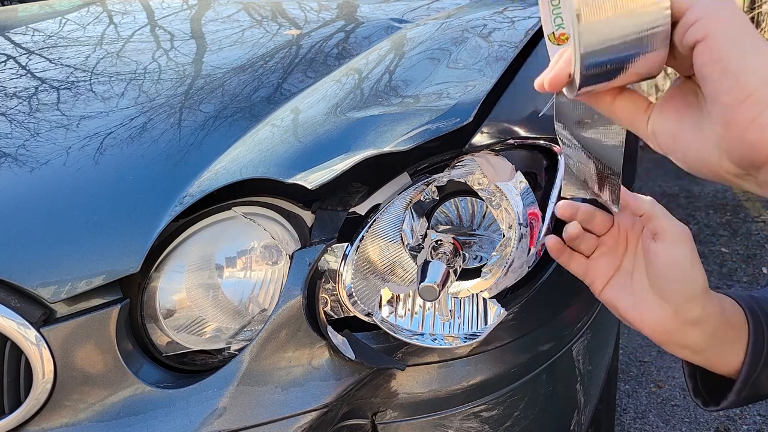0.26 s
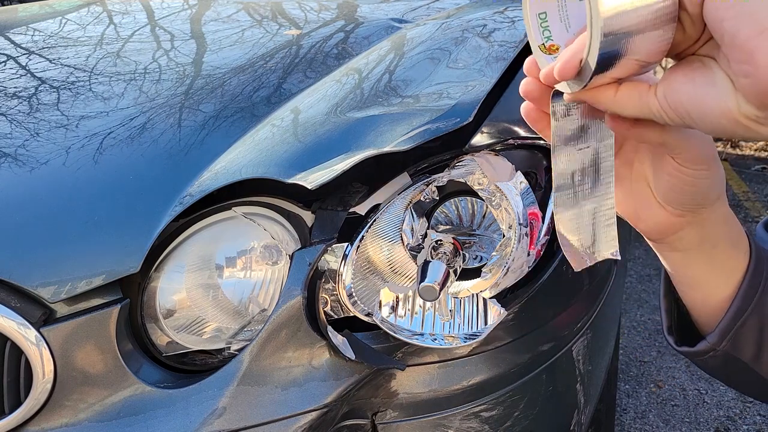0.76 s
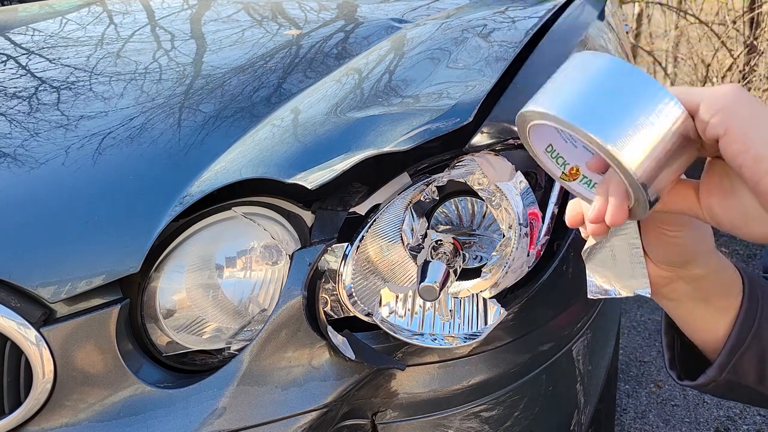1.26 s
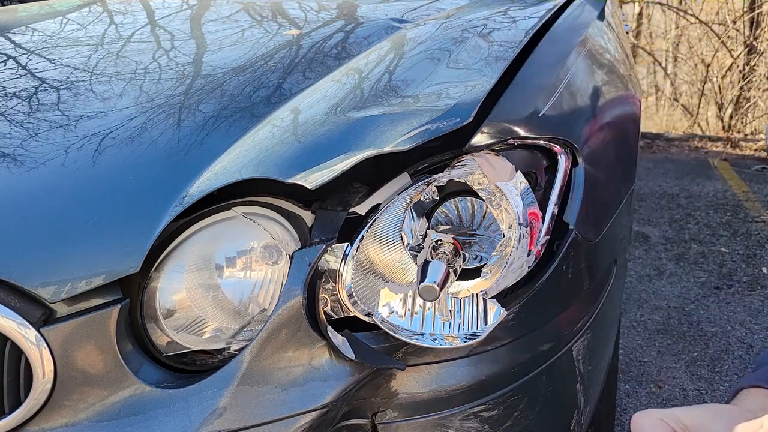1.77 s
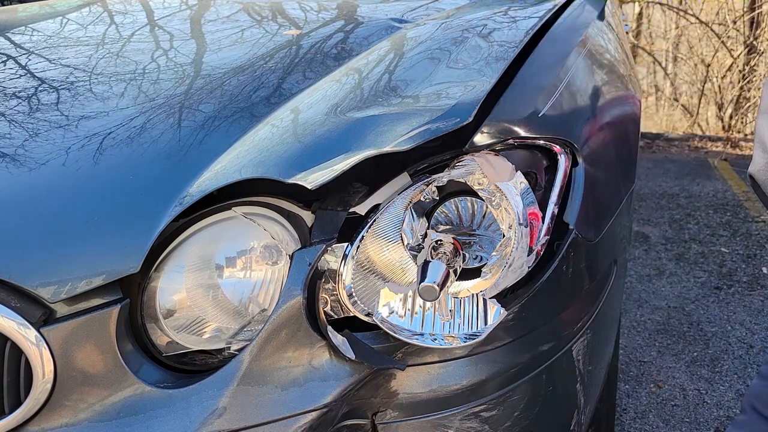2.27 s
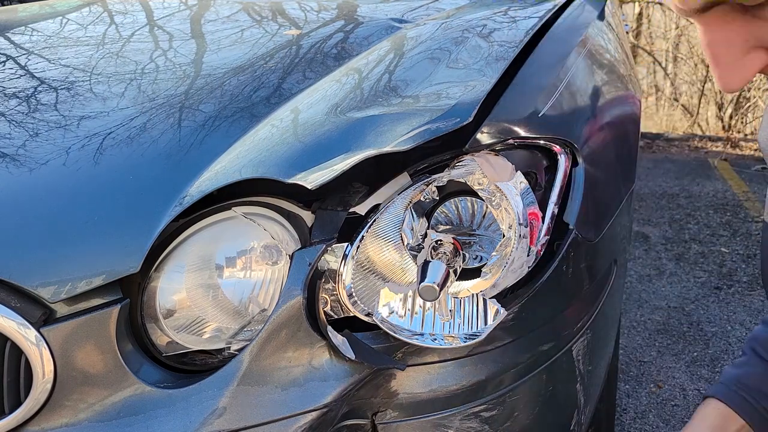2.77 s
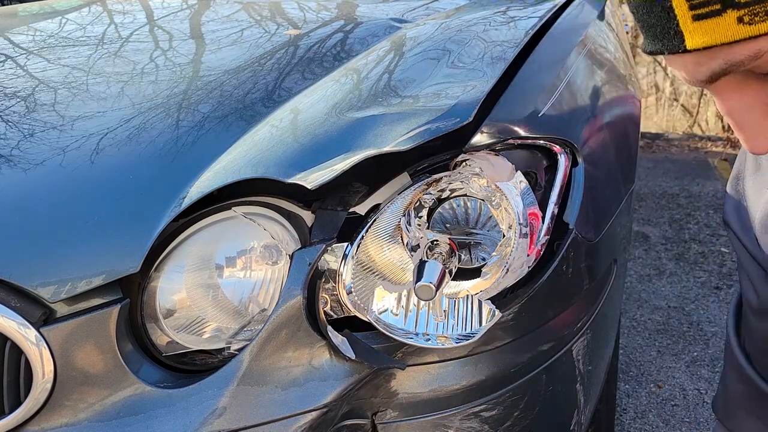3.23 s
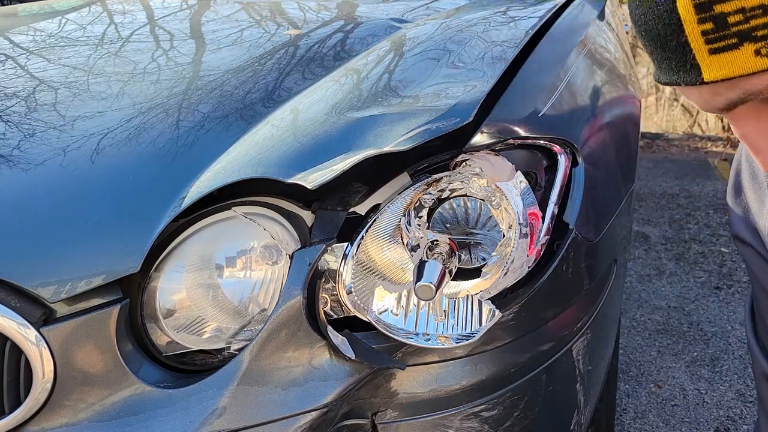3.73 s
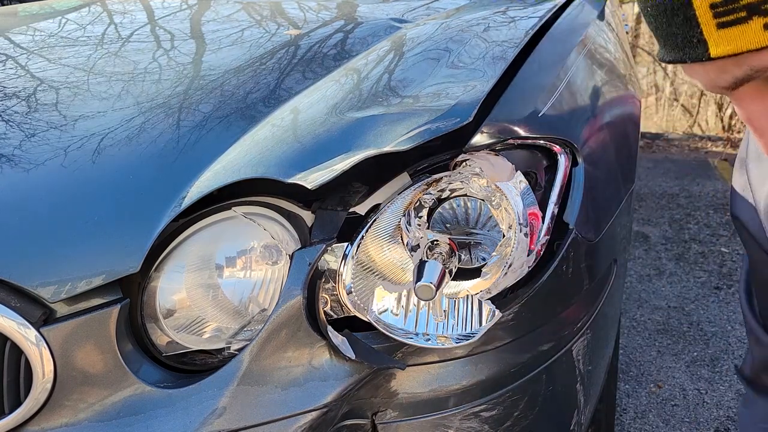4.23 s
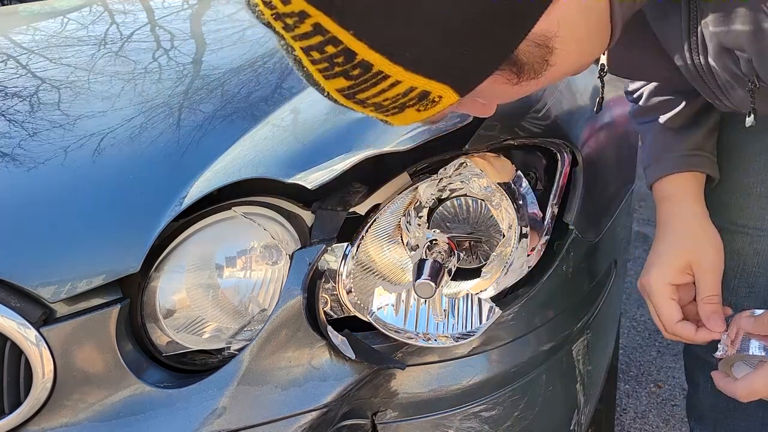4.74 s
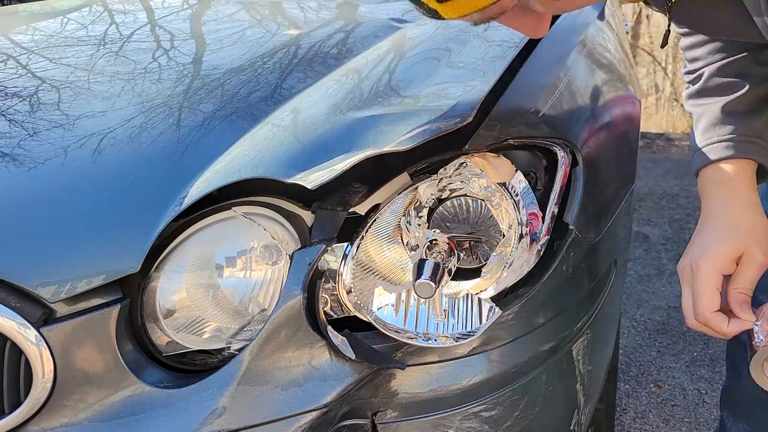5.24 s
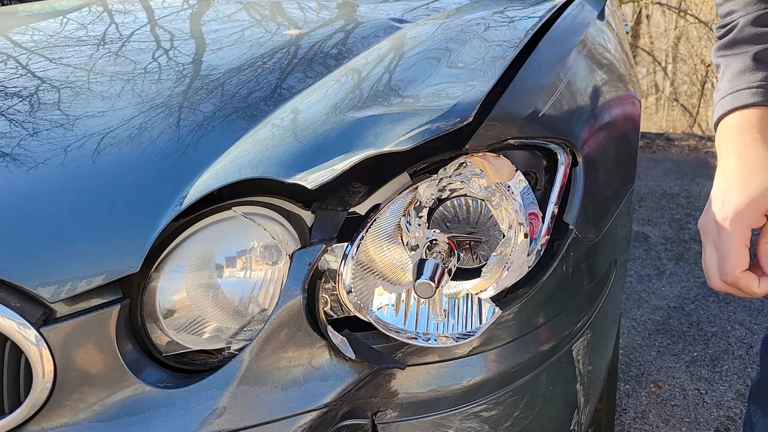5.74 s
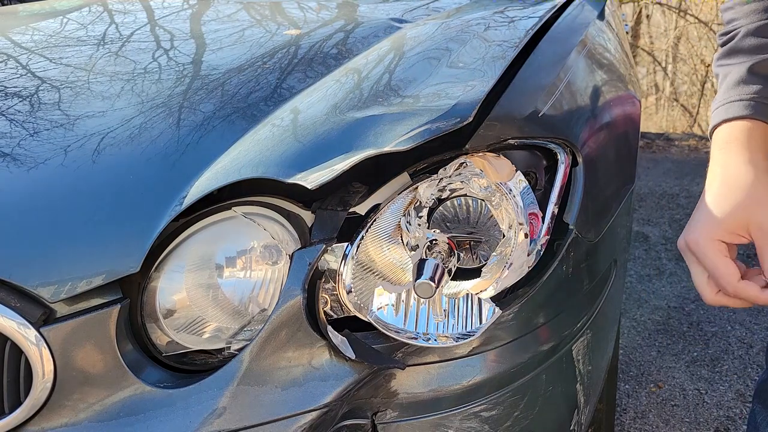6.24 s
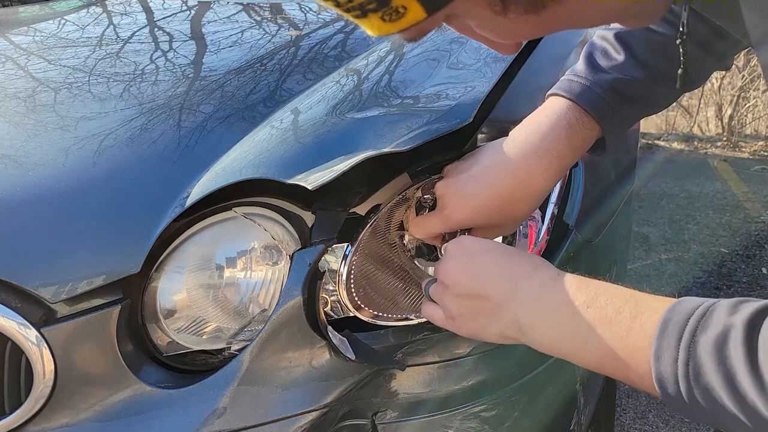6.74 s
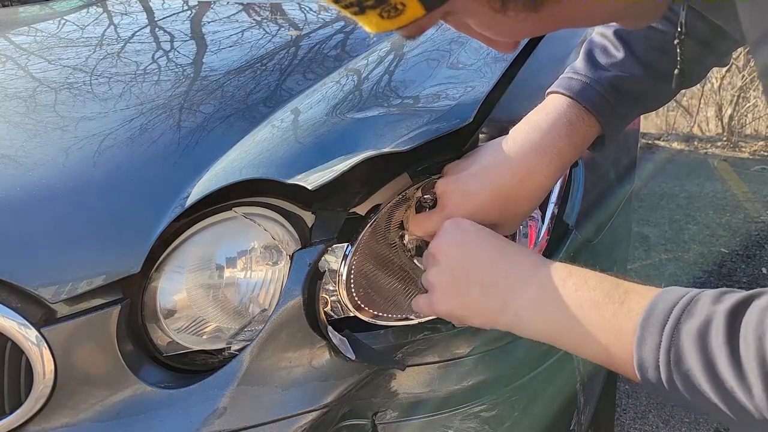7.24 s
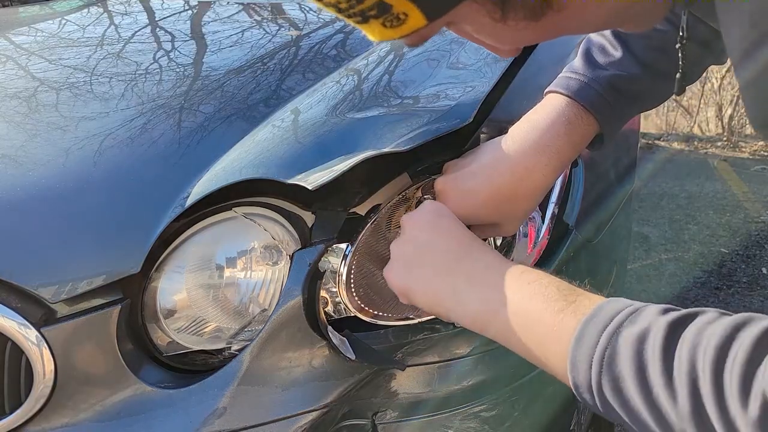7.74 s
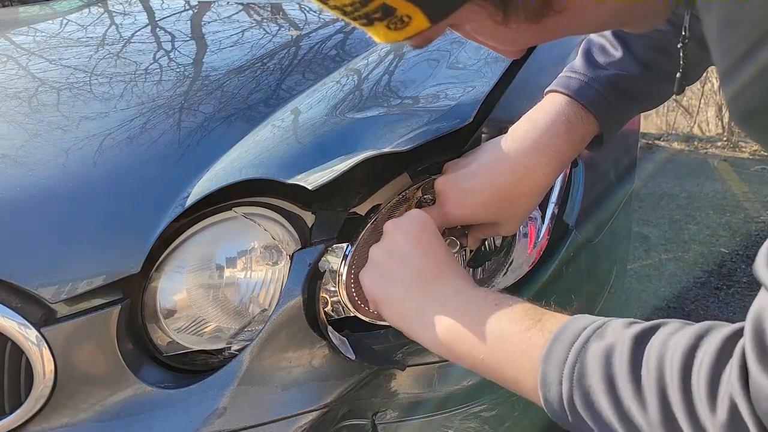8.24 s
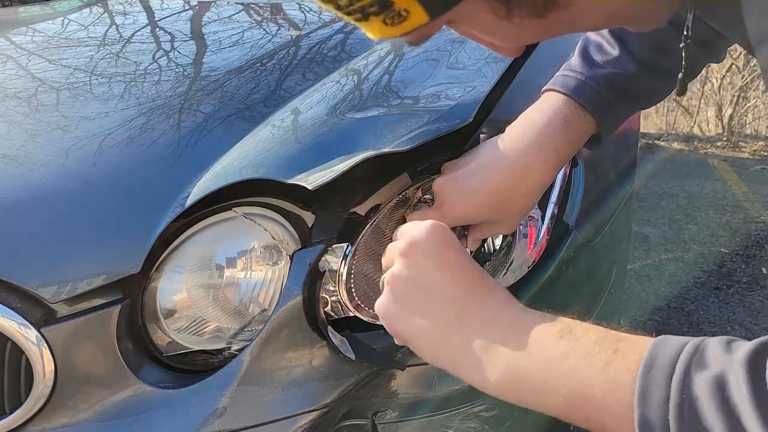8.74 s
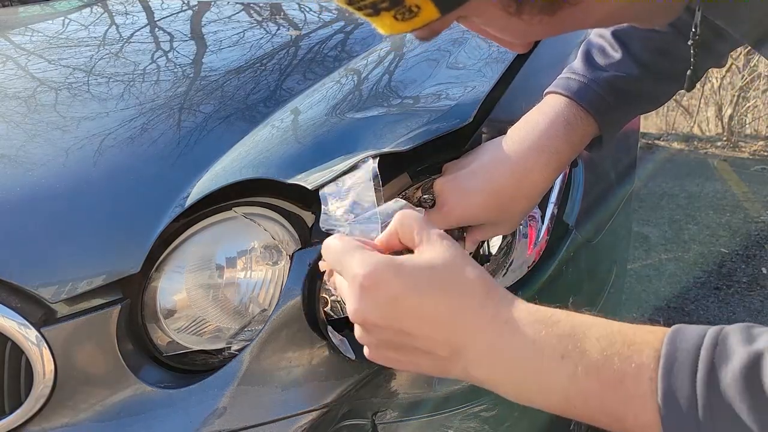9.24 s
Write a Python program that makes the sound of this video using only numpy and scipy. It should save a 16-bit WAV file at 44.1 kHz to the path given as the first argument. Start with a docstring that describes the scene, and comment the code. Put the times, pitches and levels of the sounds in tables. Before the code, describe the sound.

Close, dry outdoor sound with faint traffic and low wind rumble. A loud foil snap hits at 0.1 s, then near quiet with soft cloth rustle. At 1.9 s a short, bright, sticky rip cracks sharply; faint crinkles follow to 2.9 s. A click, stronger on the left, falls at 2.94 s as the background steps and wind grows heavier. At 3.3 s a cardboard roll lands toward the right with a hollow knock, bouncing and rattling briefly. Wind buffets until 4.6 s, when the background jumps again; a faint, wavering engine hum rises from about 4.8 to 6.7 s. A quick foil tear comes at 5.5 s and a small tick at 6.0 s. After another jump at 6.7 s, foil crackles thickly, with a sharp snap at 7.5 s, a dense loud burst at 8.3-8.4 s, dull presses, scattered cracks, a strong snap at 9.1 s, a wind thump at 9.2 s and a last crackle at 9.5 s.

```python
"""Outdoors, at arm's length, foil tape is pulled off its roll, torn and pressed onto a car headlight.
Glue lets go in dense slips (gated noise puffs), the foil buckles in sharp cracks (fast-decaying noise bursts),
sleeves rustle (swelling hiss) and the cardboard roll drops and bounces (decaying modes and a rattle).
Wind buffets two microphone ports (low noise) over distant traffic (filtered noise) and a far engine (wavering tones).
The background steps abruptly three times, and a click falls near the first step."""
import sys
import numpy as np
from scipy import signal
from scipy.fft import rfft, irfft, next_fast_len
from scipy.io import wavfile
from scipy.ndimage import uniform_filter1d

SR = 44100
rng = np.random.default_rng(int(sys.argv[2]) if len(sys.argv) > 2 else 0)


def generate_wav(sig):
    """Save sig (samples, or channels by samples) to the path in sys.argv[1] as 16-bit PCM at SR."""
    pcm = np.round(np.clip(np.atleast_2d(sig).T, -1, 1) * 32767).astype(np.int16)
    wavfile.write(sys.argv[1], SR, pcm)


N = 418950


def undb(db):
    """Amplitude ratio of a level in decibels."""
    return 10 ** (np.asarray(db) / 20)


def unit(x):
    """Normalise the power: rms 1 in each channel."""
    return x / np.sqrt(np.mean(x ** 2, axis=-1, keepdims=True))


def gain_at(table, size):
    """Frequency response: a (Hz, dB) table interpolated over log frequency at the bins of a transform."""
    table_hz, table_db = np.transpose(table)
    bin_hz = np.arange(size // 2 + 1) * SR / size + 1  # offset by 1 Hz so the log exists at zero
    return undb(np.interp(np.log(bin_hz), np.log(table_hz), table_db))


def colour(x, table):
    """Linear filtering by spectral multiplication with a (Hz, dB) table, then rms 1."""
    length = x.shape[-1]
    size = next_fast_len(length)
    filtered = irfft(rfft(x, size) * gain_at(table, size), size)
    return unit(filtered[..., :length])


def sides(pan_db):
    """Interchannel level difference: gains whose left minus right is pan_db."""
    return undb(np.array([pan_db, -pan_db]) / 2)


def walk(rate):
    """Slow random modulation: levels held 1 / rate s and slewed twice, with a spread near 1."""
    hold = int(SR / rate)
    levels = np.repeat(rng.standard_normal(N // hold + 1), hold)
    return 1.3 * uniform_filter1d(uniform_filter1d(levels, hold), hold)[:N]


def pair(shape, like):
    """Partial coherence: two noises with correlation like, as two ports hear a spread source."""
    mid, side = rng.standard_normal((2,) + shape)
    shared, opposed = np.sqrt(1 + like) * mid, np.sqrt(1 - like) * side
    return np.array([shared + opposed, shared - opposed]) / np.sqrt(2)


def add(out, s, x):
    """Superposition: mix the stereo event x into out at s seconds."""
    i = int(s * SR)
    out[:, i:i + x.shape[1]] += x[:, :N - i]


def stroke(length_s, size, edge_s):
    """Amplitude gate with linear ramps at both ends."""
    t = np.arange(size) / SR
    return np.clip(np.minimum(t, length_s - t) / edge_s, 0, 1)


def shot(s):
    """Piecewise-constant settings: the columns of the section in force at time s."""
    # times where the settings step: start_s
    steps_s = (2.938, 4.583, 6.722)
    # one row per section: road_db, road_treble_db, cloth_hiss_db, tape_left_minus_right_db,
    # peel_bass_tilt_db, peel_treble_tilt_db
    sections = [(-48.5, 7.5, -61.5, -2.5, -7.5, -10.5), (-48.5, 10.1, -58, -2.5, 0, 0),
                (-46.5, -5, -66, -3, -11.5, -1.7), (-46.5, 8, -59, 0.2, -0.8, -6)]
    return np.array(sections).T[:, np.searchsorted(steps_s, s)]


def foil(x, low_db, high_db, ring_hz, ring_db, ring_width):
    """Spectral shaping: foil as the microphone hears it, tilted at both ends, with one added resonance; rms 1."""
    # spectrum of the foil as the microphone hears it: frequency_hz, density_db (per Hz)
    heard_spectrum = [(180, -34.5), (300, -10), (405, -10.5), (520, -19.5), (1030, -3.5), (1240, -0.5),
                      (1490, -1), (2070, -2), (2750, -4.5), (3360, -4.5), (5180, -6), (9930, -5),
                      (11700, -8), (12700, 2.5), (16100, -12)]
    # corners of the tilt, bass to treble: frequency_hz
    corners_hz = (1800, 3200, 5500, 11500)
    size = x.shape[1]
    hz = np.arange(size // 2 + 1) * SR / size
    ring = 1 + undb(ring_db) * np.exp(-((hz / ring_hz - 1) / ring_width) ** 2)
    tilt = gain_at(list(zip(corners_hz, (low_db, 0, 0, high_db))), size)
    return unit(irfft(rfft(x) * gain_at(heard_spectrum, size) * tilt * ring, size))


def ticks():
    """Random point events: faint buckles as fingers work the foil, in rows like those of the cracks."""
    # spells of handling: start_s, end_s, rate_per_s, mean_peak_db
    spells = [(1.872, 1.941, 90, -34), (2.598, 2.9, 10, -36), (7.041, 7.5, 30, -32), (7.5, 9.3, 14, -36.5)]
    scatter_db, t60_s = 2.5, .022
    lowest_hz, highest_hz = 2000, 8000
    bass_tilt_db, treble_tilt_db = -13.5, -3
    rows = []
    for start_s, end_s, rate, mean_db in spells:
        length_s = end_s - start_s
        for when, pitch, strength in rng.random((round(rate * length_s), 3)):
            ring_hz = lowest_hz * (highest_hz / lowest_hz) ** pitch
            peak_db = mean_db + scatter_db * (2 * strength - 1)
            rows.append((start_s + when * length_s, peak_db, ring_hz, bass_tilt_db, treble_tilt_db, t60_s))
    return rows


def cracks(tail_db=-26, tail_t60=0.12, rise_s=.0008, snap_db=5, snap_t60=0.0017, size=4096):
    """Snap-through buckling: a sharp snap, a short burst of flexing and a faint scattered tail."""
    # foil buckling: start_s, peak_db (before panning), ring_hz, bass_tilt_db, treble_tilt_db, t60_s
    buckles = [(.125, -3, 3600, -6.5, -24.5, 0.015), (.186, -39, 5000, -14, -20, .018),
               (0.234, -31.5, 2730, -7, -12, 0.022), (1.9051, -26.5, 4990, -27, -13, .018),
               (1.9164, -24, 6990, -24, -15, .03), (1.9505, -5.5, 5970, -32, -10, .025),
               (1.9654, -7, 5600, -27, -7, 0.03), (2.1081, -31, 3580, -22, -15, 0.019),
               (2.608, -31.5, 5690, -14, -2, 0.017), (2.693, -29, 7850, -18, 4, 0.029),
               (2.7882, -22, 3780, -6, -4, 0.028), (2.8688, -19, 5950, -2, -18, 0.022),
               (3.3138, -2, 5600, -2, -14, 0.025), (3.4029, -19.5, 1540, -3, -20, 0.053),
               (3.438, -31, 2580, 1.1, -21, 0.046), (3.4664, -27.5, 1500, -2, -26, 0.039),
               (3.4897, -33, 1640, 2, -14, .02), (5.5151, -14, 8360, -33, 8, 0.017),
               (5.5381, -10, 5780, -26, 10, 0.023), (5.5533, -13, 4260, -17, -2, 0.036),
               (5.5641, -9, 4640, -15, -10, 0.014), (5.5746, -13, 4530, -13, -10, .018),
               (5.5854, -21, 3770, -24, -9, .015), (6.0396, -17.5, 8420, -6.5, -12, .022),
               (6.8015, -15, 3070, -4, -62, 0.02), (6.873, -15.5, 3860, -1, -14, 0.019),
               (7.0386, -8.5, 2730, -5, -40, 0.019), (7.06, -11.5, 1930, 4, -18, .03),
               (7.1172, -13, 2640, 5, -8, .014), (7.1298, -8.5, 2120, -6, -10, .026),
               (7.1463, -5, 6400, -4, -7, 0.019), (7.1547, -15, 2790, -14, -7, .024),
               (7.188, -17, 2000, -6, 4, .021), (7.204, -14, 7420, -3, -6, .027),
               (7.2194, -17, 8330, -15, -11, .02), (7.2386, -14, 8010, 0, -9, 0.033),
               (7.2667, -25, 4840, -15, -9, .016), (7.276, -12.5, 8200, -14, -5, .016),
               (7.3013, -24, 3260, -24, -12, .018), (7.3416, -12, 4730, -17, -11, 0.016),
               (7.417, -16, 4800, -4, -5, 0.049), (7.4614, 2.5, 5940, -5, 0, 0.02),
               (7.4744, -9, 5100, -20, -3, .022), (7.577, -15, 7660, -14, -8, .018),
               (7.6092, -13.5, 7600, -8.5, -4.5, 0.024), (7.792, -20, 7070, -20, -1, 0.02),
               (7.8446, -30.5, 5100, -5, -4, .022), (7.8988, -16.5, 5200, -9, -4, .018),
               (7.9143, -13, 5540, -1, -9, 0.013), (7.9362, -10, 4000, -10, -10, 0.014),
               (7.9514, -9, 6900, -12, -6, 0.011), (7.9578, -5, 5230, -17, -5, .02),
               (7.9693, -4, 5250, -10, -12, .018), (7.988, -10, 2090, -7, -23, .018),
               (7.9956, -13, 2110, -7.5, -21, .024), (8.002, -6, 5030, -17, -20, 0.019),
               (8.0214, -9, 4880, -7.5, -16, 0.017), (8.038, -18, 2070, -6, -19, .018),
               (8.099, -12.5, 3640, -12, -10, .015), (8.118, -27, 6030, -10, -10, 0.014),
               (8.1355, -12.5, 4840, -12, -11, .017), (8.157, -31, 7000, -25, -10, .018),
               (8.2366, -8.5, 5600, -14, -10, 0.012), (8.241, -12.5, 6040, -12, -16, .012),
               (8.2746, -14, 5700, -9, -7, 0.02), (8.297, -16, 4430, -11, -12, .009),
               (8.32, -0.5, 5540, -6, -11, .032), (8.3265, 1.5, 5100, -1, -5, 0.038),
               (8.353, -3, 4280, -19, -8, .02), (8.3572, 0.5, 4530, -1.5, 0, .025),
               (8.3703, 0, 7900, -6, -6, .018), (8.3795, -7, 7150, -14, -17, .015),
               (8.3872, -9, 3480, -13, -14.5, .026), (8.4064, -0.5, 3370, -12, -18, 0.041),
               (8.4556, -16, 2430, -9, -9, .022), (8.4628, -16, 2460, -7, -14, 0.034),
               (8.5, -20, 5460, -23, -11, 0.026), (8.6136, -12, 6760, -5, -2, 0.029),
               (8.6448, -28.5, 1990, -9, -6, .018), (8.7193, -6.5, 3960, -5.5, -4.5, 0.028),
               (8.8931, -11.5, 2680, -11, -10.5, 0.029), (9.0834, 1.5, 6400, -10.5, -9, 0.039),
               (9.16, -20, 3170, -2, -17, 0.037), (9.2695, -29.5, 3740, -22, -12, .048),
               (9.4773, -14, 2660, -4.5, -16, .02)]
    pan_scatter_db = 2.5  # random left-right scatter around the section's pan
    out, t = np.zeros((2, N)), np.arange(size) / SR
    snap = undb(snap_db - 60 * t / snap_t60)
    tail = undb(tail_db - 60 * t / tail_t60)
    rise = np.minimum(t / rise_s, 1) ** 2
    for s, peak_db, ring_hz, low_db, high_db, t60 in buckles + ticks():
        pan_db = shot(s)[3] + pan_scatter_db * rng.standard_normal()
        noise = foil(pair((size,), 0.21), low_db, high_db, ring_hz, ring_db=6, ring_width=0.093)
        flexing = undb(-60 * t / t60)
        burst = noise * (snap + flexing + tail) * rise
        burst /= abs(burst).max(axis=1, keepdims=True)
        add(out, s - rise_s / 2, burst * undb(peak_db) * sides(pan_db)[:, None])
    return out


def peel(size=8192):
    """Adhesive stick-slip: threads of glue let go at random, few large and many small, as puffs of noise."""
    # glue letting go: start_s, length_s, level_db (at the start), growth_db (over the length), ring_hz
    pulls = [(1.878, 0.074, -46.5, 11.5, 5130), (1.945, 0.041, -18.5, 1.5, 5930),
             (5.519, 0.078, -31.5, 6, 4600), (5.589, .023, -37, -4, 4400), (6.785, .11, -54.5, 12, 3500),
             (7.044, .073, -43.5, -7, 2510), (7.114, 0.05, -35.5, 8, 6000),
             (7.165, 0.124, -34.5, 1.5, 2080), (7.444, 0.053, -32, 6, 5540), (7.892, 0.065, -41, -6, 5000),
             (7.95, 0.036, -23, 0, 5200), (7.987, .057, -31, -4, 3930), (8.085, 0.058, -38, -3, 3960),
             (8.232, 0.062, -46, -4, 5000), (8.296, .11, -26, -1, 4970), (8.346, 0.054, -13, -8, 7350),
             (8.398, 0.044, -15, -17, 3300), (8.443, 0.069, -31, -16, 2500),
             (9.065, 0.114, -35, -3.5, 3560), (9.439, .063, -53, 14, 3030)]
    full_rate, halving_db = 4200, 21.5  # slips per s at 0 dB; halved by each such drop in level
    scatter_db, decay_s = 4.2, .0012  # mean spread of the slip sizes; time constant of a puff
    out, t = np.zeros((2, N)), np.arange(size) / SR
    for s, length_s, level_db, growth_db, ring_hz in pulls:
        rate = full_rate * 2 ** (level_db / halving_db)
        pan_db, low_db, high_db = shot(s)[3:]
        chance, strength = rng.random((2, size))
        slips = (chance < rate / SR) * undb(-scatter_db * np.log(strength))
        puffs = unit(signal.lfilter([1], [1, -np.exp(-1 / (decay_s * SR))], slips))
        noise = foil(pair((size,), .25), low_db, high_db, ring_hz, ring_db=2, ring_width=.2)
        growth = undb(level_db + growth_db * np.minimum(t / length_s, 1))
        gain = growth * stroke(length_s, size, edge_s=0.0069)
        add(out, s, noise * puffs * gain * sides(pan_db)[:, None])
    return out


def drag(size=4096):
    """Regular stick-slip friction: a thumb drags along the foil, each slip a decaying burst of noise."""
    # spectrum of the drag as the microphone hears it: frequency_hz, density_db (per Hz)
    drag_spectrum = [(350, -62), (600, -34.5), (1010, -17), (1330, 0), (1490, -15), (2190, -7), (2690, -27),
                     (5350, -6), (5890, -17.5), (7760, -12.5), (10500, -23), (14200, -21), (16100, -35)]
    start_s, length_s, slips_hz, level_db = 7.374, .05, 480, -26.5
    phase = np.arange(size) * slips_hz / SR + rng.random()
    slips = pair((size,), .3) * np.exp(-(phase % 1) / .35)  # decay constant as a share of the slip period
    out = np.zeros((2, N))
    gate = stroke(length_s, size, edge_s=0.0032)
    add(out, start_s, colour(slips, drag_spectrum) * gate * undb(level_db))
    return out


def roll(rattle_db=-22, rattle_t60=0.25):
    """Impact excitation of modes: each landing rings the cardboard core, which rattles on for a moment."""
    # the roll lands and bounces: start_s, level_db, left_minus_right_db
    landings = [(3.314, -4.5, -9), (3.404, -20.5, -9.5), (3.446, -40, -17), (3.466, -34, -5)]
    # modes of the cardboard core: frequency_hz, level_db, t60_s
    modes = [(665, -13, 0.031), (700, 0.5, 0.058), (794, -6.5, 0.024), (1280, -10.5, 0.057),
             (1853, -20, 0.058)]
    # rattle of the loose core: frequency_hz, density_db (per Hz)
    rattle_spectrum = [(350, -16), (750, 6), (1400, -11), (3000, -13), (8000, -43)]
    out, t = np.zeros((2, N)), np.arange(8192) / SR
    ring = sum(undb(db - 60 * t / t60) * np.sin(2 * np.pi * hz * t) for hz, db, t60 in modes)
    rise = np.minimum(t / 0.0012, 1)
    for s, level_db, pan_db in landings:
        rattle = colour(pair(t.shape, 0.56), rattle_spectrum) * undb(rattle_db - 60 * t / rattle_t60)
        add(out, s, (ring + rattle) * rise * undb(level_db) * sides(pan_db)[:, None])
    return out


def presses(t60=0.12, size=4096):
    """Soft impact: fingers push on the lamp housing, a dull band of noise that swells fast and dies."""
    # pushes on the housing: start_s, level_db, centre_hz
    pushes = [(5.563, -32.5, 830), (5.584, -40, 740), (7.129, -36, 719), (7.459, -33, 576),
              (8.284, -32, 775), (8.326, -34.5, 598), (8.355, -25, 786), (8.387, -26, 400),
              (8.406, -27.5, 340), (8.465, -37, 428), (8.719, -33.5, 576), (8.893, -29, 363),
              (9.084, -24.5, 370), (9.16, -41.5, 355)]
    out, t = np.zeros((2, N)), np.arange(size) / SR
    rise = np.minimum(t / 0.0015, 1)
    for s, level_db, hz in pushes:
        thud = colour(pair((size,), 0.68), [(hz / 3, -30), (hz, 0), (hz * 3, -30)])
        add(out, s, thud * rise * undb(level_db - 60 * t / t60))
    return out


def rustle():
    """Sliding friction of cloth on cloth: a soft, slightly patchy hiss that swells with each movement."""
    # sleeves and hands moving: middle_s, length_s, level_db
    movements = [(.53, 0.12, -54), (2.01, .1, -47.5), (2.3, 0.3, -55.5), (2.448, 0.21, -43.5),
                 (2.8, 0.27, -55), (3.38, 0.32, -52), (4.25, 0.37, -54.5), (5.611, .08, -52.5),
                 (7.245, 0.33, -43.5), (8.45, 0.6, -50.5), (9.204, .2, -53)]
    # spectrum of rubbed cloth as the microphone hears it: frequency_hz, density_db (per Hz)
    cloth_spectrum = [(710, -36.5), (1200, -12.5), (1940, -9), (2920, -5.5), (4620, -8), (6060, -8),
                      (7130, -10.5), (8860, -15), (10500, -26.5), (13700, -13.5), (16100, -25.5)]
    t = np.arange(N) / SR
    swells = sum(undb(db) * np.exp(-(2 * (t - s) / length_s) ** 2) for s, length_s, db in movements)
    hiss = undb(shot(t)[2])
    patches = undb(1.2 * walk(40))
    gain = np.hypot(hiss, swells) * patches  # independent sources add in power
    return colour(pair((N,), 0.15), cloth_spectrum) * gain * sides(-2.1)[:, None]


def wind():
    """Turbulent pressure at the ports: eddies thump each one on its own, so coherence is low."""
    # gusts, one curve per section: time_s, level_db (before panning and thumps)
    gusts = [
        [(0, -40), (1.0, -51), (1.35, -42), (1.7, -49), (1.8, -41), (2.36, -45.5), (2.42, -32.5), (2.55, -51),
         (2.93, -43)],
        [(2.94, -22), (3.06, -22), (3.12, -34.5), (3.25, -19.5), (3.35, -26.5), (3.69, -25.5), (3.72, -18),
         (4.32, -22.5), (4.35, -17.5), (4.58, -30)],
        [(4.59, -42), (4.7, -34.5), (5.1, -29), (5.24, -26.5), (5.36, -36), (5.66, -30), (6.17, -35.5),
         (6.25, -27.5), (6.36, -36), (6.72, -30)],
        [(6.73, -46), (7.17, -32), (7.38, -46), (7.45, -36.5), (7.78, -34), (7.83, -25.5), (7.92, -24),
         (7.96, -47), (8.31, -27.5), (8.38, -51), (9.13, -34.5), (9.19, -28), (9.22, -13.5), (9.26, -26),
         (9.33, -22.5), (9.4, -37.5), (9.5, -25)],
    ]
    # spectrum of the wind at the ports: frequency_hz, density_db (per Hz)
    wind_spectrum = [(8.8, -43.5), (15, -13), (53, -5.5), (70, 0), (128, -15), (261, -33), (368, -41),
                     (400, -42.5), (520, -63.5), (880, -120)]
    s, db = np.concatenate(gusts).T
    thumps = undb(3 * np.array([walk(20), walk(20)]))
    gust = undb(np.interp(np.arange(N) / SR, s, db))
    return colour(pair((N,), 0.061), wind_spectrum) * sides(-1.5)[:, None] * thumps * gust


def traffic():
    """Diffuse far field: tyre and engine noise with a flickering dull part and a smooth treble."""
    # spectrum of the sum of both sides: frequency_hz, density_db (per Hz)
    mid_spectrum = [(35, -16.5), (60, -4), (89, -4), (143, -12.5), (180, -14), (207, -14), (288, -18.5),
                    (323, -17), (381, -20.5), (700, -27.5), (787, -29.5), (1630, -43), (5490, -59.5),
                    (12700, -66), (16100, -85.5)]
    # likeness of the two sides, before limiting to +-0.9: frequency_hz, correlation
    likeness = [(60, 0.92), (130, 0.97), (290, 0.67), (640, -0.41), (1410, -0.57), (3100, -0.1),
                (6820, -0.25), (15000, 0.01)]
    level_db, treble_db = shot(np.arange(N) / SR)[:2]
    size = next_fast_len(N)
    hz = np.arange(size // 2 + 1) * SR / size + 1
    like_hz, like = np.transpose(likeness)
    like = np.clip(np.interp(np.log(hz), np.log(like_hz), like), -.9, .9)
    mid, side = rfft(rng.standard_normal((2, N)), size) * gain_at(mid_spectrum, size)
    side = side * np.sqrt((1 - like) / (1 + like))
    both = np.array([mid + side, mid - side])
    band = (hz > 200) & (hz < 900)
    both /= np.sqrt(2 * np.sum(abs(mid[band]) ** 2)) / size  # rms 1 for the mid in this band
    dull = 1 / (1 + (hz / 1500) ** 2)
    low = irfft(both * dull, size)[:, :N]
    high = irfft(both * (1 - dull), size)[:, :N]
    return undb(level_db) * (low * undb(0.98 * walk(9)) + high * undb(treble_db))


def engine():
    """Additive synthesis of a distant hum: separate tones, most rising slowly, the last steady, all wavering."""
    # tones: start_s, end_s, start_pitch_hz, rise_per_s (share of the pitch), level_db (rms, before wavering)
    tones = [(4.75, 6.3, 84, .047, -42), (4.75, 6.72, 176, .047, -44), (5.0, 6.0, 250, .047, -52),
             (6.45, 6.7, 268, .047, -47), (4.9, 6.4, 322, .047, -52), (6.001, 6.7, 297.7, .047, -53.5),
             (6.73, 7.25, 150, 0.00037, -43)]
    fade_s = 0.12  # centred on each start and end
    out, t = np.zeros(N), np.arange(N) / SR
    for start_s, end_s, hz, rise, db in tones:
        pitch_hz = hz * (1 + rise * (t - start_s) + 0.00593 * walk(11))  # wavers as the air moves
        phase = 2 * np.pi * np.cumsum(pitch_hz) / SR
        gate = np.clip(np.minimum(t - start_s, end_s - t) / fade_s + .5, 0, 1)
        out += np.sqrt(2) * gate * undb(db + 2.04 * walk(8.8)) * np.sin(phase)
    return out


def step_click():
    """Exponential relaxation: a sudden step, stronger on the left, that decays to rest."""
    start_s, left_db, right_db, decay_s = 2.9383, -11, -22.5, .006
    out = np.zeros((2, N))
    add(out, start_s, undb([[left_db], [right_db]]) * np.exp(-np.arange(4096) / SR / decay_s))
    return out


def scene():
    """Superposition of the tape, hands, wind and far background."""
    tape = cracks() + peel() + drag() + roll()
    hands = presses() + rustle()
    background = wind() + traffic() + engine()
    return tape + hands + background + step_click()


def record(dry):
    """Saturation and band limiting: the phone clips the loudest peaks and cuts the top above 16 kHz."""
    clipped = np.clip(dry, -.97, .97)
    low_pass = signal.ellip(8, .2, 75, 16000, fs=SR, output="sos")
    return signal.sosfilt(low_pass, clipped)


dry = scene()
out = record(dry)
generate_wav(out)
```